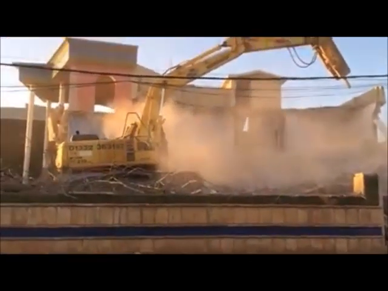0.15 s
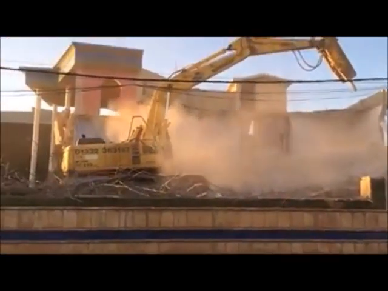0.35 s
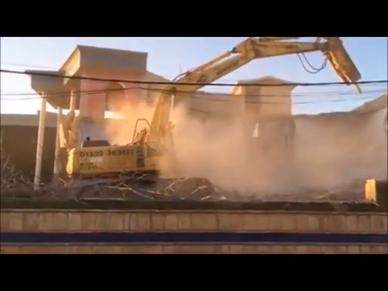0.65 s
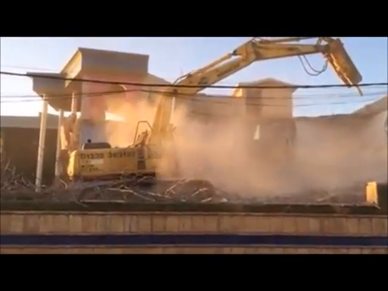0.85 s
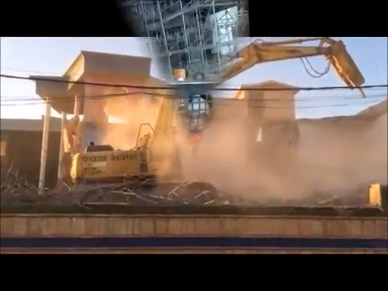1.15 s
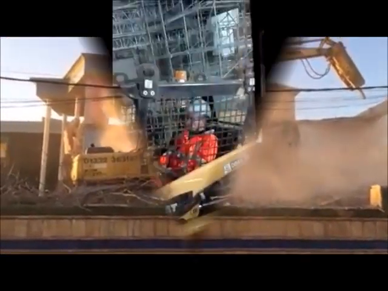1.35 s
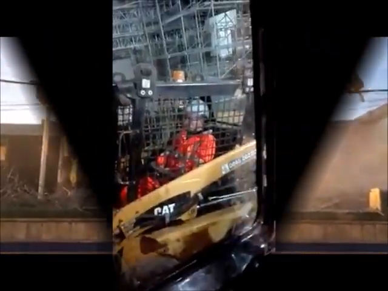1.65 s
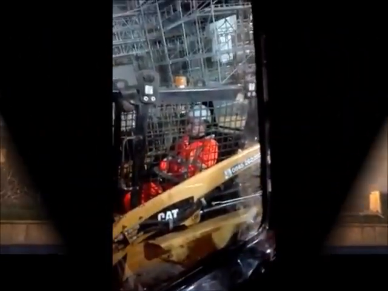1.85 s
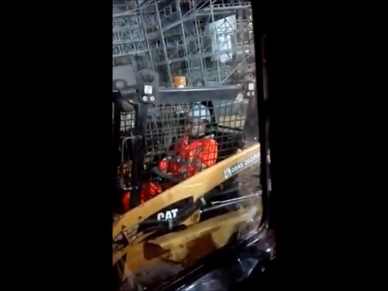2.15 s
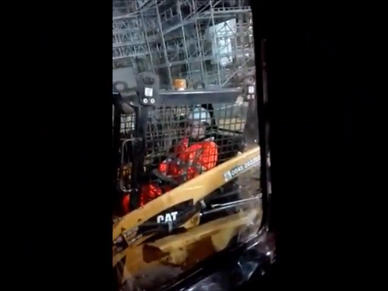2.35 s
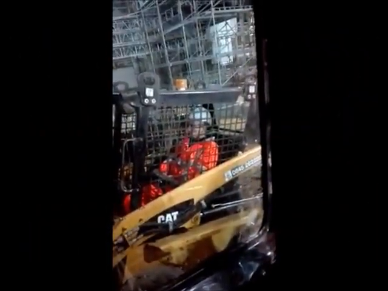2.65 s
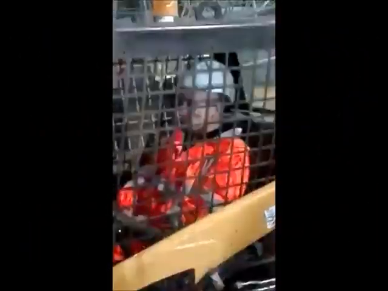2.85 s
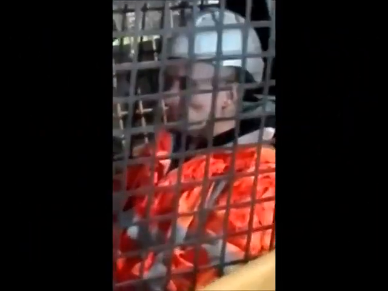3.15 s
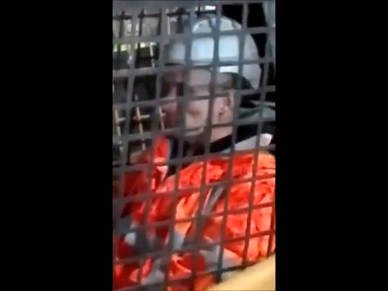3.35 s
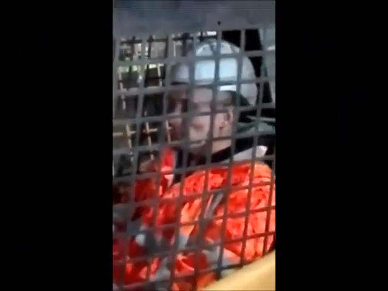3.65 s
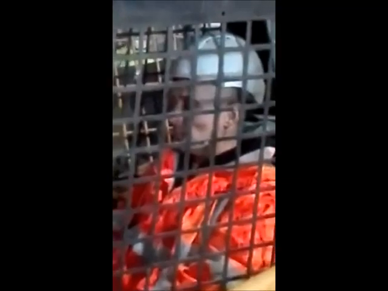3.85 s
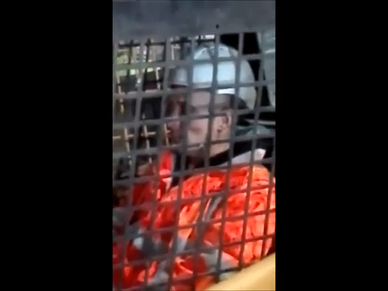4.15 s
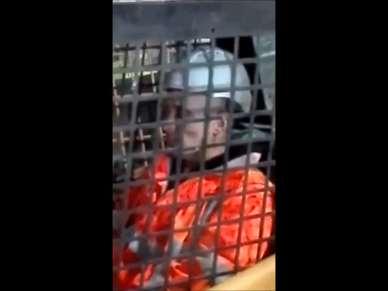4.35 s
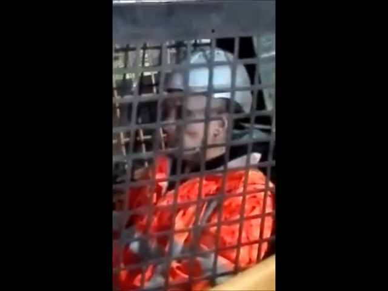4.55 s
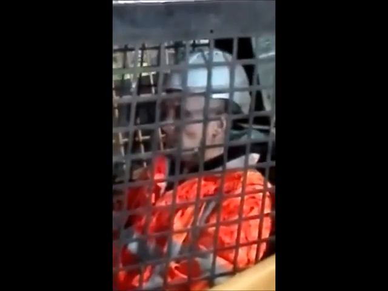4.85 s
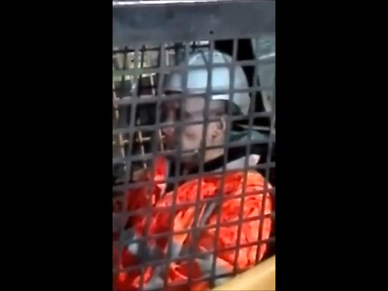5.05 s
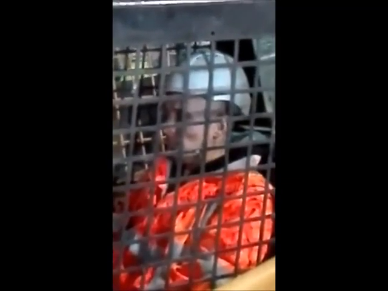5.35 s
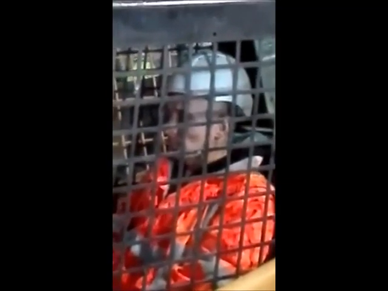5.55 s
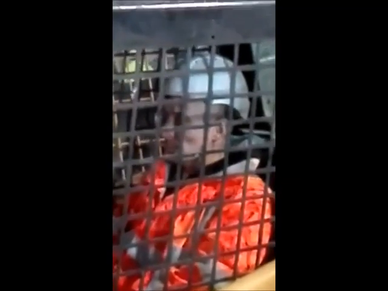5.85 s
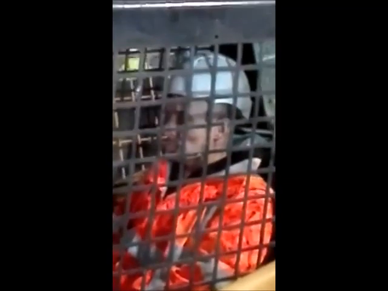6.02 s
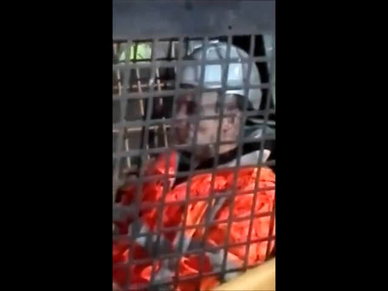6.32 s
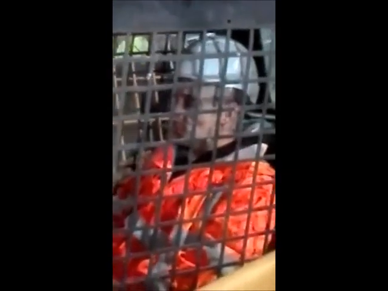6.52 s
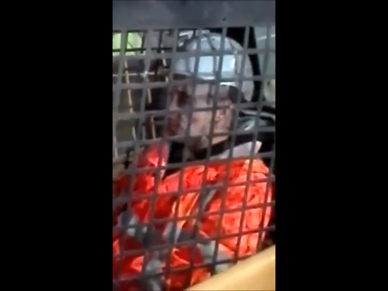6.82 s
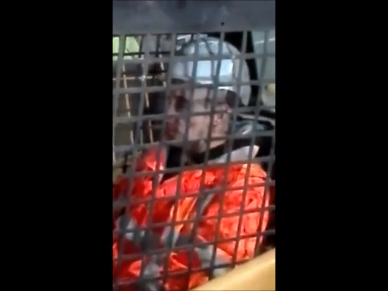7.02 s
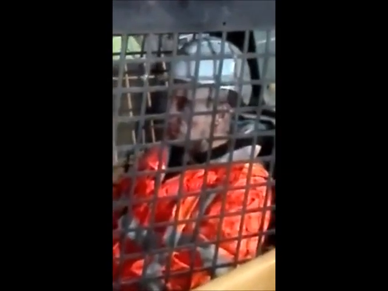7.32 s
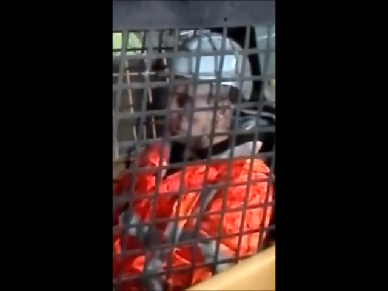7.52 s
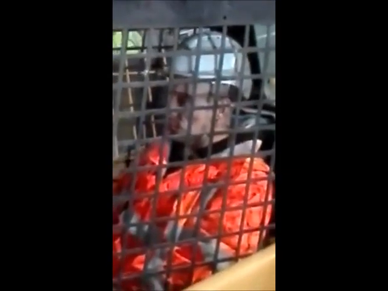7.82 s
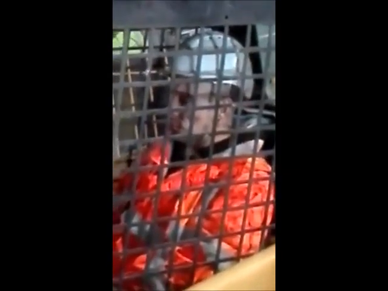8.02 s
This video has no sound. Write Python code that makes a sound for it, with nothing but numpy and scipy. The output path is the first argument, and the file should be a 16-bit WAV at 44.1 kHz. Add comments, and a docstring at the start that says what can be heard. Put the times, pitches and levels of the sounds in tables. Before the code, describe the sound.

An excavator roars as rubble thuds and slides, then gives way to the deep hum of diesel machines idling in a hall.

```python
"""A six-cylinder excavator roars across a street, bogging down under load while rubble slides and thuds.
From 1 s a hall fades in under it; the street cuts off at 2.2 s. In the hall, idling diesels, a pump and
a fan drone over a deep, beating 44 Hz hum, with valve clatter, air leaks and two late rattles.
Machines are tones locked to a shaft, debris and knocks are filtered impacts, air is shaped noise.
The hall level steps up at 1.5 s and back down at 3.7 s."""
import sys
import numpy as np
from scipy import signal
from scipy.fft import rfft, irfft, next_fast_len
from scipy.io import wavfile
from scipy.ndimage import uniform_filter1d

SR = 44100
rng = np.random.default_rng(int(sys.argv[2]) if len(sys.argv) > 2 else 0)


def dump(signal):
    """Clip the signal to [-1, 1] and save it as 16-bit WAV at the path in sys.argv[1]."""
    limited = np.clip(np.atleast_2d(signal).T, -1, 1)
    pcm = np.round(limited * 32767).astype(np.int16)
    wavfile.write(sys.argv[1], SR, pcm)


N = 360718

# excavator tones, firing at order 6, pump at 36: cycle_order, relative_db
EXCAVATOR_TONES = [(3, -53.5), (6, -44.5), (9, -51.5), (12, -47.5), (16, -48.5), (18, -66), (22, -52.5),
                   (24, -61.5), (32, -59.5), (36, -55), (40, -65), (48, -61.5), (53, -64), (54, -62),
                   (59, -59.5), (72, -62), (75, -79), (79, -63), (92, -63.5), (124, -63.5), (144, -81)]
# engine bogging down: time_s, cycle_hz
ENGINE_SPEED = [(0, 16), (1.27, 16), (1.42, 14.85), (2.3, 14.85)]
# tones drown once it labours: time_s, low_gain_db, upper_gain_db
TONE_GAINS = [(0, 0, 1.5), (1.3, 1, 0.5), (1.42, -0.5, -13), (2.3, -3.5, -14)]
# engine roar: freq_hz, gain_db
ROAR_SPECTRUM = [(20, -23), (45, -15), (60, -7), (75, -3.5), (124, -4.5), (250, -6), (350, -10.5),
                 (470, -16), (700, -13), (1100, -15.5), (1270, -11.5), (1450, -16), (2770, -24),
                 (7300, -41.5), (15000, -60)]
# street noise envelopes: time_s, roar_gain_db, rumble_gain_db, grit_gain_db, crunch_gain_db
STREET_GAINS = [(0, -41, -40, -65, -60), (0.15, -43, -37.5, -68, -57), (0.33, -42, -38.5, -67, -67),
                (0.5, -41.5, -41, -65.5, -56), (0.62, -42, -38.5, -62, -59), (0.72, -43, -36, -62, -54.5),
                (0.82, -43, -40, -65, -53), (0.9, -41, -37, -62, -55.5), (1.05, -42, -41, -61.5, -54.5),
                (1.2, -42.5, -36.5, -63, -54), (1.27, -40.5, -43, -65, -66), (1.36, -43, -37.5, -67, -54),
                (1.5, -43.5, -40, -65, -67), (1.62, -42.5, -38.5, -75, -60), (1.9, -42, -46.5, -70, -66),
                (2.22, -42.5, -38, -69, -64)]
# slabs landing: start_s, gain_db, pitch_hz
SLAB_HITS = [(0.253, -19, 182), (0.301, -24, 147), (0.398, -28, 157), (0.145, -22, 245), (0.17, -25, 97),
             (0.61, -22, 100), (0.8, -22, 100), (1.05, -27, 100), (0.615, -20, 200), (0.651, -18, 252),
             (0.687, -23.5, 304), (0.741, -21.5, 197), (0.813, -21, 251), (0.878, -25, 204),
             (0.97, -23, 252), (1.07, -21, 247), (1.178, -23, 250), (1.241, -24, 190), (1.305, -26, 224),
             (1.454, -22, 240), (1.565, -23, 188), (1.68, -20, 225), (1.863, -20.5, 119), (1.924, -37, 140),
             (2.138, -26, 192)]
# pebble showers: start_s, gain_db
PEBBLE_FALLS = [(0.56, -62), (0.69, -57), (0.922, -54), (1.145, -64)]
# pebble impacts: freq_hz, gain_db
PEBBLE_SPECTRUM = [(800, -18), (2000, 2), (6000, -5), (12000, -16), (15500, -19)]

# hall levels all precede hall_gain()
# groups of close hum tones: pitch_hz, drift_hz_per_s, in_step_with_first_s
HUM_GROUPS = [
    [(44.42, 0, 5), (45.578, 0, 5.108)],
    [(60.785, 0, 5), (60.052, 0.102, 5.27), (58.206, 0, 5.025)],
    [(51.229, 0, 5), (50.54, -0.05, 5.08), (49.616, -0.04, 5.261)],
    [(25.615, 0, 5)],
]
# per group, per tone: level_db
HUM_LEVELS = [
    [-25.5, -44],
    [-42.5, -41.5, -57],
    [-48.5, -50, -50.5],
    [-50],
]
# per idling machine: base_hz
MACHINE_RATES = [15.195, 25.62, 22.21, 334.9, 36.6, 195.4]
# tones per machine: order, level_db
MACHINE_TONES = [
    [(2, -53), (6, -59.5), (8, -68), (9, -65), (11, -63), (15, -69.5), (16, -68.5), (18, -73.5),
     (32, -73.5), (34, -72), (60, -69.5), (64, -71), (72, -73.5), (76, -77), (97, -74.5), (108, -78)],
    [(3, -57), (5, -54.5), (6, -61.5), (7, -54), (8, -65.5), (10, -74), (11, -65), (12, -69), (14, -74),
     (16, -76), (17, -79.5), (20, -73.5), (23, -80), (28, -73.5), (38, -76.5)],
    [(3, -59), (4, -59.5), (8, -65.5), (12, -76)],
    [(1, -58.5), (2, -63)],
    [(1, -50.5)],
    [(1, -60.5)],
]
# per machine, pump steadiest: waver_db
MACHINE_WAVERS = [2.2, 1.2, 0.62, 0.2, 1.4, 1.6]
# fan and valve noise: freq_hz, gain_db
AIR_SPECTRUM = [(20, -18), (33, -19.5), (60, -21.5), (80, -29.5), (102, -33), (112, -33.5), (140, -37.5),
                (185, -35), (260, -39.5), (320, -38.5), (390, -42.5), (455, -40), (500, -42.5),
                (545, -40.5), (570, -42.5), (625, -44), (700, -41), (760, -41), (950, -40.5), (1040, -40.5),
                (1130, -42), (1330, -41), (1650, -43), (1950, -44), (2330, -46), (2550, -50), (3000, -48),
                (4600, -52.5), (5500, -52.5), (8300, -64), (10000, -67.5), (13500, -71), (14000, -75),
                (15300, -76)]
# its stereo width: freq_hz, side_gain_db
AIR_WIDTH = [(40, -50), (300, -20.5), (2000, -33), (4000, -17.5), (8000, -6.5), (14000, -6.5)]
# casing panel resonances: centre_hz, width_hz, level_db
CASING_PANELS = [(921, 85, -67.5), (1119, 80, -67), (1465, 65, -70.5), (1640, 110, -72)]
# loose metal: start_s, gain_db, centre_hz
LOOSE_RATTLES = [(7.015, -54, 1470), (7.245, -53, 1410)]
# air leaks: low_hz, high_hz, level_db
LEAK_BANDS = [(3800, 4410, -70.5), (4770, 5700, -81.5), (8750, 9840, -81)]

STREET_CUT_S, CUT_FADE_S = 2.232, 0.0041
THUD_T60_S, CRUNCH_T60_S, SHOWER_T60_S, RATTLE_T60_S, ECHO_T60_S = 0.095, 0.094, 0.43, 0.29, 0.6
HALL_START_S, HALL_FADE_S, HALL_GAIN_DB = 1.03, 0.44, -4
BOOST_ON_S, BOOST_RISE_S, BOOST_OFF_S, BOOST_FALL_S, BOOST_DB = 1.52, 0.051, 3.72, 0.029, 7
TIME_S = np.arange(N) / SR


def excavator(roar_gain_db):
    """Uneven firings and pump tones over a roar that throbs six times a cycle."""
    cycle_hz, = curves(ENGINE_SPEED)
    low_db, upper_db = curves(TONE_GAINS)
    low, angle = shaft_tones(cycle_hz, EXCAVATOR_TONES[:8], drift=0.003, waver_db=2.8, waver_hz=25)
    upper, _ = shaft_tones(cycle_hz, EXCAVATOR_TONES[8:], drift=0.0012, waver_db=2.5, waver_hz=8)
    puffs = 1 + 0.1 * np.cos(6 * angle)
    roar = level(colour(puffs * rng.standard_normal(N), ROAR_SPECTRUM), 3.47)
    return undb(low_db) * low + undb(upper_db) * upper + undb(roar_gain_db) * roar


def slab_thuds(rise_s=0.011, crunch_db=-18.5):
    """Slabs landing: a soft push into a short low ring, plus a crunch of broken stone."""
    out, t = np.zeros(N + SR), np.arange(SR // 4) / SR
    for start_s, db, hz in SLAB_HITS:
        ring = np.sin(2 * np.pi * hz * t) * (1 - np.exp(-t / rise_s)) * decay(t, THUD_T60_S)
        crunch = band(rng.standard_normal(len(t)), 280, 2780) * decay(t, CRUNCH_T60_S)
        start = int(start_s * SR)
        out[start:start + len(t)] += undb(db) * (ring + undb(crunch_db) * crunch)
    return out[:N]


def rubble(rumble_gain_db, grit_gain_db, crunch_gain_db):
    """Tumbling stone: dense impacts in a low, a high and a middle band."""
    rumble = level(band(grains(900, 2.0), 153, 362), -3.5) * undb(rumble_gain_db)
    grit = level(band(grains(5000, 0.82), 5300, 10700), -4) * undb(grit_gain_db + 1.2 * walk(25.1))
    crunch = level(band(grains(1500, 1.8), 1200, 3840), 0) * undb(crunch_gain_db + 2.7 * walk(14.16))
    return rumble + grit + crunch


def pebble_showers(rise_s=0.012):
    """Bright sprays of pebbles that come at once and trickle away."""
    envelope = 0
    for start_s, db in PEBBLE_FALLS:
        age_s = np.maximum(TIME_S - start_s, 0)
        envelope += undb(db) * (1 - np.exp(-age_s / rise_s)) * decay(age_s, SHOWER_T60_S)
    return envelope * level(colour(grains(6000, 1.5), PEBBLE_SPECTRUM), 0)


def hums(waver_db=0.56):
    """Deep tones that beat as close neighbours drift in and out of step."""
    out = 0
    for group, levels_db in zip(HUM_GROUPS, HUM_LEVELS):
        first_hz = group[0][0]
        first_turns = first_hz * TIME_S + rng.random()
        for (hz, drift_hz_per_s, in_step_s), db in zip(group, levels_db):
            since_s = TIME_S - in_step_s
            turns = first_turns + (hz - first_hz) * since_s + drift_hz_per_s * since_s ** 2 / 2
            out += np.sqrt(2) * undb(db + waver_db * walk(2.5)) * np.sin(2 * np.pi * turns)
    return out


def idling_machines():
    """Diesels, pump and fan, each droning at multiples of its own near-steady rate."""
    return sum(shaft_tones(hz, tones, drift=0.0004, waver_db=waver_db, waver_hz=4)[0]
               for hz, tones, waver_db in zip(MACHINE_RATES, MACHINE_TONES, MACHINE_WAVERS))


def fan_and_valve_noise(mid_db=-47.5):
    """Reverberant stereo noise; the treble clatters a little and spreads wide."""
    clatter = undb(walk(20) + 0.32 * walk(10))
    steady, wide = rng.standard_normal((2, N))
    treble_flicker = colour((clatter - 1) * steady, [(800, -25), (3000, -3)])
    mid = colour(reflections(steady + treble_flicker), AIR_SPECTRUM)
    side = colour(clatter * wide, AIR_SPECTRUM, AIR_WIDTH)
    return stereo(mid, side) * undb(mid_db) / np.std(mid)


def valve_knocks(swell_db=1.6, swell_hz=7):
    """Dense small knocks ring the casing panels; each panel swells on its own."""
    knocks, out = grains(2500, 1.0), 0
    for hz, width_hz, db in CASING_PANELS:
        ring = level(band(knocks, hz - width_hz / 2, hz + width_hz / 2), db)
        out += ring * undb(swell_db * walk(swell_hz))
    return out


def rattles(edge_ratio=1.15):
    """Short runs of small knocks on loose sheet metal."""
    knocks, out = grains(900, 2.2), 0
    for start_s, db, hz in LOOSE_RATTLES:
        envelope = (TIME_S > start_s) * decay(np.abs(TIME_S - start_s), RATTLE_T60_S)
        out += envelope * level(band(knocks, hz / edge_ratio, hz * edge_ratio), db)
    return out


def air_leaks(flutter_db=2.0, flutter_hz=11):
    """Escaping air: fluttering bands of hiss, nearly mono."""
    mid, side = rng.standard_normal((2, N))
    noise, out = stereo(mid, 0.13 * side), 0
    for low_hz, high_hz, db in LEAK_BANDS:
        hiss = band(band(noise, low_hz, high_hz), low_hz, high_hz)
        out += level(hiss, db) * undb(flutter_db * walk(flutter_hz))
    return out


def reflections(x, wet=0.33):
    """Hall reflections add many small fixed spectral peaks and dips."""
    t = np.arange(SR // 2) / SR
    tail = rng.standard_normal(len(t)) * decay(t, ECHO_T60_S)
    return x + wet * signal.fftconvolve(x, tail / np.linalg.norm(tail))[:N]


def hall_gain():
    """Eased fade-in, then a boost switched on and off."""
    fade = np.sin(np.pi / 2 * ramp(HALL_START_S, HALL_FADE_S))
    boost = ramp(BOOST_ON_S, BOOST_RISE_S) - ramp(BOOST_OFF_S, BOOST_FALL_S)
    return fade * undb(HALL_GAIN_DB + BOOST_DB * boost)


def shaft_tones(hz, tones, drift, waver_db, waver_hz):
    """Wavering tones locked to one wandering shaft; returns sound and cycle angle in radians."""
    angle = 2 * np.pi * np.cumsum(hz * (1 + drift * walk(1.502))) / SR
    wavers_db = [waver_db * walk(waver_hz) for _ in range(3)]
    out = 0
    for i, (order, db) in enumerate(tones):
        out += np.sqrt(2) * undb(db + wavers_db[i % 3]) * np.sin(order * angle + 2 * np.pi * rng.random())
    return out, angle


def grains(per_s, scatter_db):
    """Random impacts, many small and a few large."""
    return (rng.random(N) < per_s / SR) * undb(scatter_db * rng.exponential(size=N)) * rng.standard_normal(N)


def walk(rate_hz):
    """Random steps, smoothed twice; unit spread."""
    hold = int(SR / rate_hz)
    steps = np.repeat(rng.standard_normal(N // hold + 1), hold)
    smooth = uniform_filter1d(uniform_filter1d(steps, hold), hold)[:N]
    return smooth / np.std(smooth)


def colour(x, *spectra):
    """Filter by (freq_hz, gain_db) points joined on a log axis."""
    size = next_fast_len(N)
    log_hz = np.log(np.arange(size // 2 + 1) * SR / size + 1e-9)
    db = sum(np.interp(log_hz, np.log(hz), gain_db) for hz, gain_db in map(np.transpose, spectra))
    return irfft(rfft(x, size) * undb(db), size)[:N]


def curves(table):
    """One linearly interpolated curve per column after time_s."""
    time_s, *columns = np.transpose(table)
    return [np.interp(TIME_S, time_s, column) for column in columns]


def band(x, low_hz, high_hz):
    return signal.sosfilt(signal.butter(2, [low_hz, high_hz], "band", fs=SR, output="sos"), x)


def ramp(start_s, length_s):
    return np.clip((TIME_S - start_s) / length_s, 0, 1)


def decay(age_s, t60_s):
    return np.exp(-np.log(1000) * age_s / t60_s)


def stereo(mid, side):
    return np.array([mid + side, mid - side])


def level(x, rms_db):
    return x * undb(rms_db) / np.sqrt(np.mean(x ** 2))


def undb(db):
    return 10 ** (np.asarray(db) / 20)


def scene():
    """Mono street, cut off short, overlapping the stereo hall."""
    roar_gain_db, *rubble_gains_db = curves(STREET_GAINS)
    street = excavator(roar_gain_db) + slab_thuds() + rubble(*rubble_gains_db) + pebble_showers()
    street_gain = 1 - ramp(STREET_CUT_S - CUT_FADE_S / 2, CUT_FADE_S)
    hall = hums() + idling_machines() + fan_and_valve_noise() + valve_knocks() + rattles() + air_leaks()
    return street_gain * street + hall_gain() * hall


def record(dry):
    """Steep low-pass at 14.8 kHz."""
    return signal.sosfilt(signal.ellip(8, 0.2, 70, 14800, fs=SR, output="sos"), dry)


dry = scene()
out = record(dry)
dump(out)
```